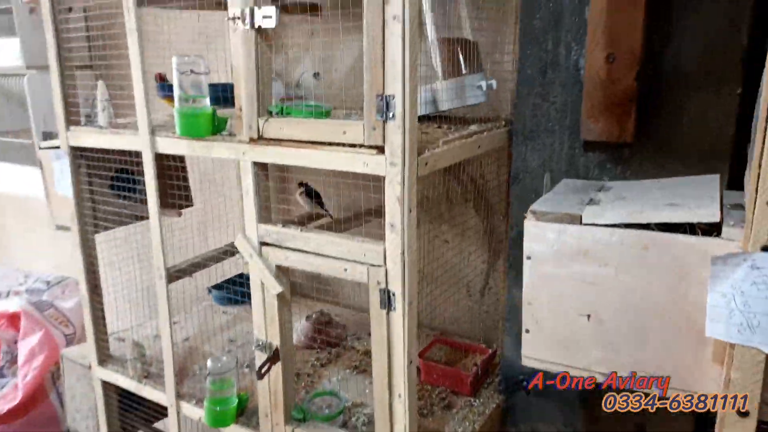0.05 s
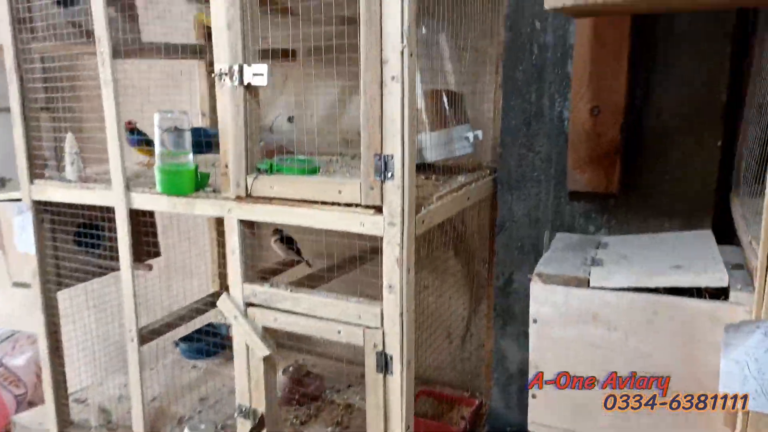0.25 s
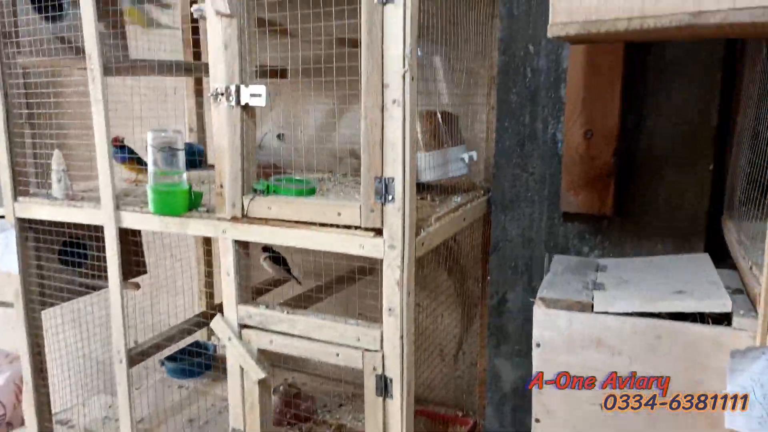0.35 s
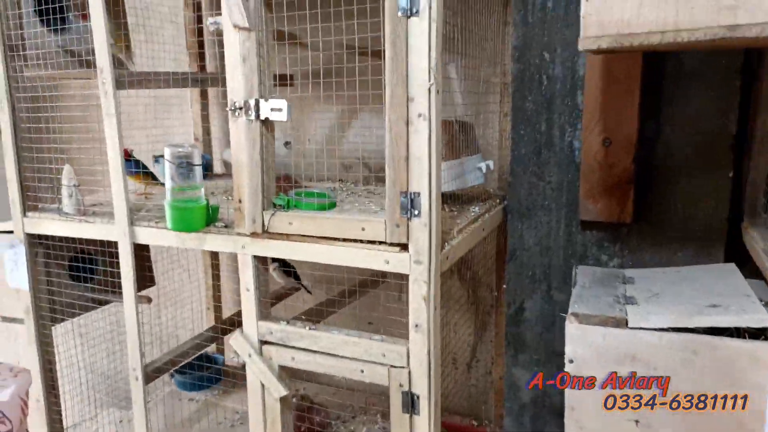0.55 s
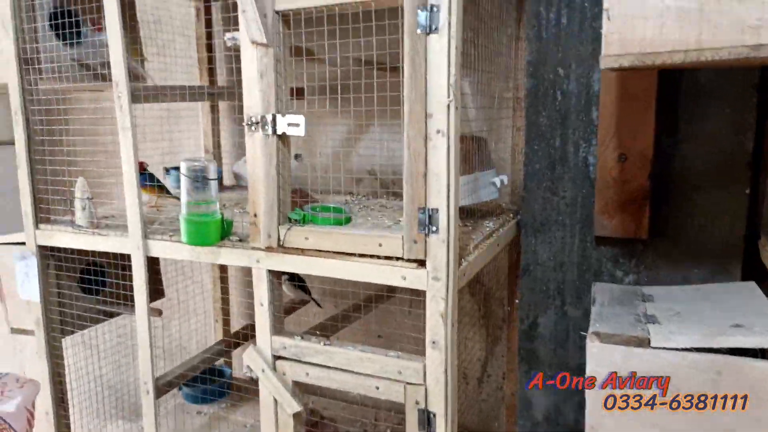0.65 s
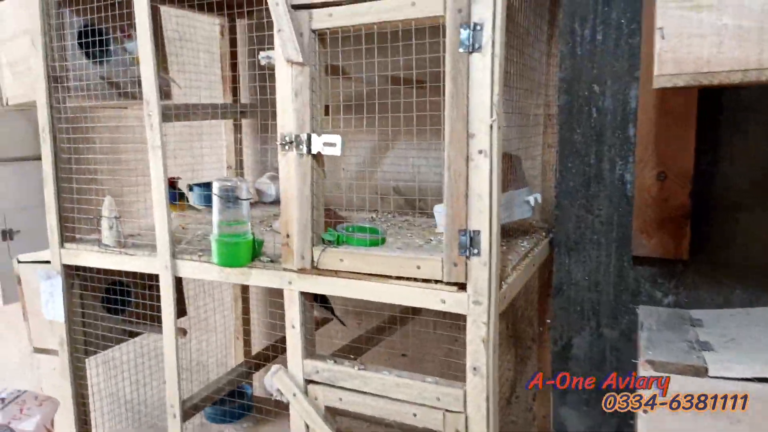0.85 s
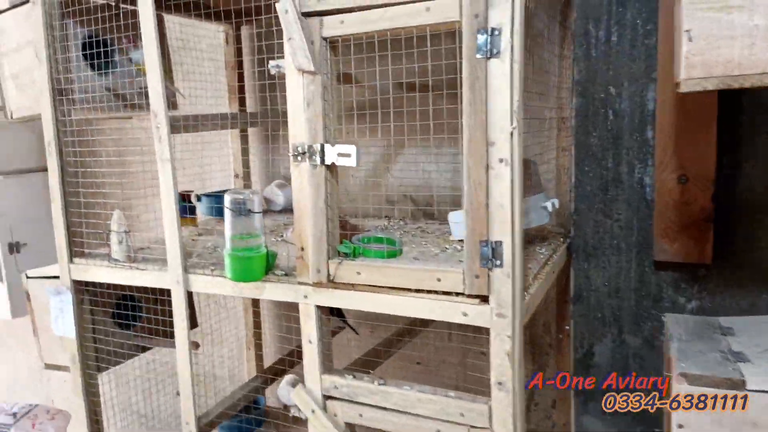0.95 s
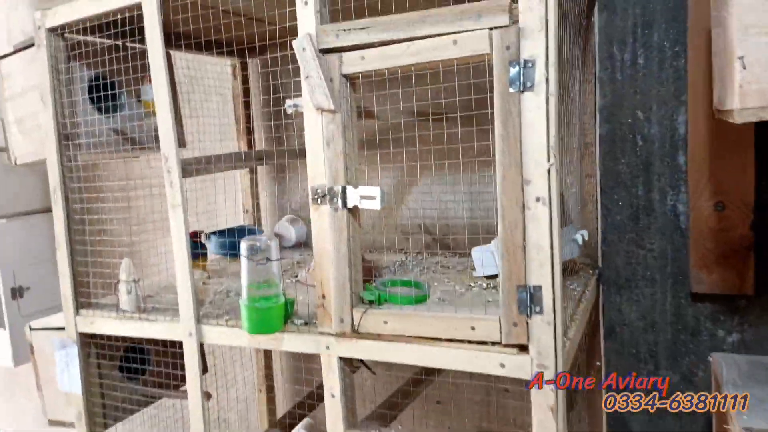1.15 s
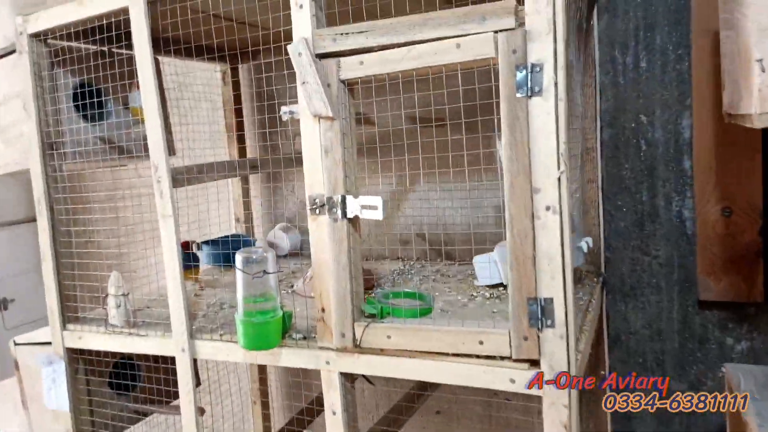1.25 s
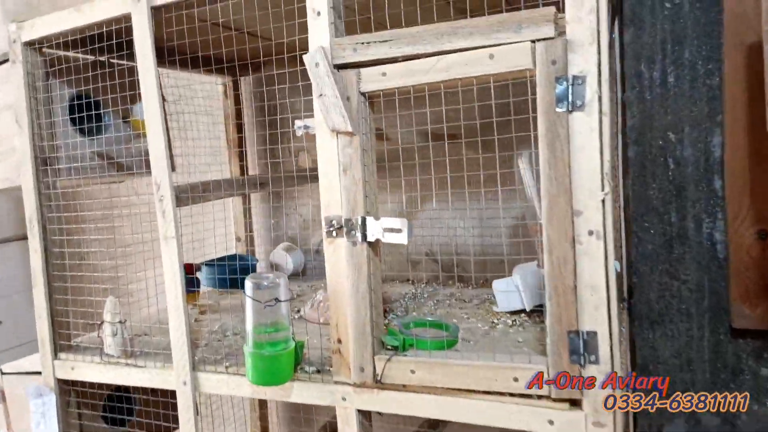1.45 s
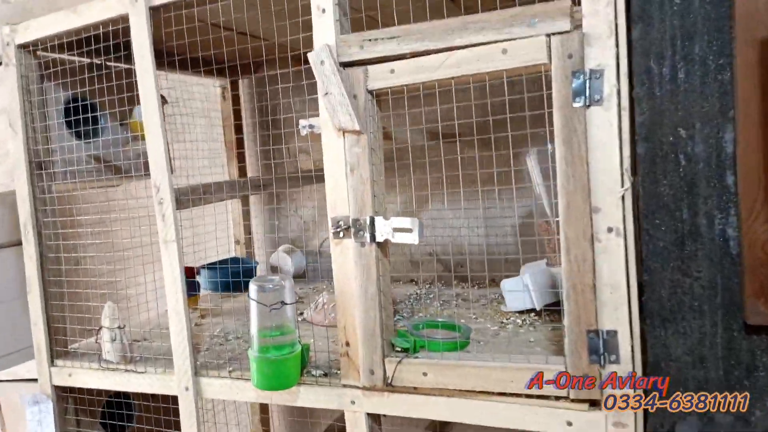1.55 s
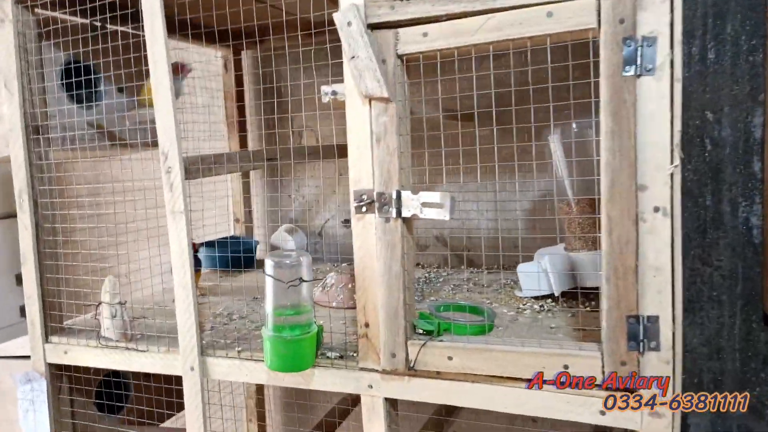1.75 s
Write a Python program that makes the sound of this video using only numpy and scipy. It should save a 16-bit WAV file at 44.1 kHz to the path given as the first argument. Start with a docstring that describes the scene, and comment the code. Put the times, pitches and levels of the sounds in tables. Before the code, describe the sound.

Caged finches chirp hoarsely in a rapid run, with sharp whistles and a faint flock behind

```python
"""A small room with wooden cages: finches call close by in a run of hoarse chirps, about nine a second.
Each chirp is a chopped, gliding tone near 6 kHz over irregular pulses ringing in beak and throat,
with an overload crackle on top. Other birds add short gliding whistles and nasal harmonic notes;
one bumps a perch, a decaying sine. Decaying noise gives the echoes of cages and room;
shaped noise gives a far flock and a low rumble."""
import sys
import numpy as np
from scipy import signal
from scipy.fft import rfft, irfft, next_fast_len
from scipy.io import wavfile
from scipy.ndimage import uniform_filter1d, map_coordinates

SR = 44100
rng = np.random.default_rng(int(sys.argv[2]) if len(sys.argv) > 2 else 0)


def store_pcm(level_fs):
    """Save levels as 16-bit WAV."""
    pcm = np.round(np.clip(level_fs, -1, 1) * 32767).astype(np.int16)
    wavfile.write(sys.argv[1], SR, np.atleast_2d(pcm).T)


N = 79380

# hoarse chirps: (start [s], squeak length [s], rasp delay [s], rasp length [s], squeak pitch [Hz],
# squeak level [dB], beak level [dB], throat level [dB], low throat level [dB], crackle level [dB])
CHIRPS = [(0.194, 0.13, 0.0041, 0.1, 6070, -24, -19, -28, -30.5, -35),
          (0.315, 0.1, 0.0058, 0.096, 6080, -17.5, -18.5, -25.5, -39.5, -30),
          (0.457, 0.12, 0, 0.12, 6106, -19.5, -22.5, -22, -34.5, -36.5),
          (0.597, 0.0886, 0, 0.1, 5960, -20, -23, -22.5, -29.5, -50),
          (0.699, 0.049, 0.0014, 0.067, 5950, -24.5, -24, -28, -38, -40.5),
          (0.737, .120, 0.00033, .110, 6020, -25.5, -26.5, -20.5, -34, -45.5),
          (0.868, 0.14, 0.0075, 0.1, 6080, -24.5, -25, -23.5, -23.5, -36),
          (1.014, 0.119, 0.00021, 0.11, 5900, -34.5, -27, -22, -33.5, -47.5),
          (1.104, .050, 0.0059, 0.067, 6100, -36, -27.5, -40, -29.5, -43),
          (1.151, 0.15, 0.0067, 0.13, 5950, -27, -24.5, -23, -32, -45.5),
          (1.250, 0.1285, .000, 0.11, 6000, -29, -25, -24, -28.5, -49),
          (1.418, 0.1, 0, 0.094, 5994, -27.5, -33, -32.5, -32.5, -48.5)]
# resonances of the rasp: (centre [Hz], width of each of two cascaded sections [Hz], relative level [dB])
BEAK = [(5130, 930, 2), (5805, 500, 2.5), (6563, 580, -5.5), (8100, 1100, -33)]
THROAT = [(3765, 820, 2.5), (4200, 860, -1), (8270, 280, -29)]
LOW_THROAT = [(2360, 1070, -3), (3094, 800, 2)]
# spectrum of the overload crackle: (frequency [Hz], relative level [dB])
CRACKLE = [(800, -9), (2000, 1.5), (7000, -12), (9500, -1), (11500, -1), (13000, 2.5), (15500, 3.5)]
# whistles: (start [s], length [s], start pitch [Hz], end pitch [Hz], level [dB], roughness [ratio])
WHISTLES = [(.000, .020, 2390, 2120, -35.5, 1.1), (.000, 0.01, 4325, 4380, -32.5, 0.9),
            (0.021, 0.047, 2766, 2830, -32, 0.68), (0.401, 0.024, 1380, 1490, -42.5, .6),
            (0.688, 0.033, 3167, 3210, -29.5, .9), (.718, 0.022, 1660, 1826, -44.5, 0.8),
            (0.803, 0.027, 1322, 1308, -41.5, 0.2), (0.956, 0.048, 2690, 3390, -29, 0.89),
            (.995, 0.033, 2550, 2560, -34, 0.54), (1.128, 0.028, 3225, 3284, -28.5, 0.4),
            (1.197, 0.022, 4115, 4030, -17.5, 0.5), (1.226, 0.018, 4090, 4097, -7.5, .1),
            (1.248, 0.026, 4033, 4146, -13.5, .1), (1.251, 0.0206, 3200, 3250, -19, .2),
            (1.264, 0.0353, 3970, 3872, -16, .4), (1.313, 0.022, 3930, 3943, -17.5, 0.22),
            (1.416, 0.089, 2300, 2330, -38.5, 0.8), (1.432, 0.0368, 3770, 3420, -29.5, 0.68),
            (1.454, 0.023, 3246, 3104, -24, .6), (1.484, 0.043, 3168, 2824, -24, 0.6),
            (1.523, 0.086, 3180, 3140, -35, 0.12), (1.759, .060, 2520, 2446, -37, 0.68),
            (1.786, 0.048, 3150, 3150, -28, .2)]
# nasal notes: (start [s], length [s], start pitch [Hz], end pitch [Hz], level [dB], roughness [ratio])
NASALS = [(-.02, 0.079, 549, 543, -34, 0.99), (0.086, 0.073, 771, 777, -44, 1.15),
          (1.508, 0.1296, 531.2, 507.5, -33, 0.14), (1.737, 0.1, 600, 636, -37, 0.78)]
# strength of the nasal harmonics: (frequency [Hz], relative level [dB])
NASAL_COLOUR = [(500, -39), (1500, -15), (2100, -12), (2650, -1), (3150, -1.5), (3700, -3.5), (4200, 2.5),
                (4750, -4), (6000, -14.5), (7500, -47), (10000, -34)]
# decay of the room: (frequency [Hz], time to fall 60 dB [s])
ROOM_T60 = [(300, 0.97), (3000, 0.4), (6000, 0.29), (14000, 0.18)]
# tone of the left microphone, which faces away from the cages: (frequency [Hz], gain [dB])
LEFT_SHADE = [(300, -39), (900, -3.5), (2000, -8), (3000, -9), (3900, -8.5), (4700, -16), (6000, -19.5),
              (6600, -23), (7200, 7), (8100, 9), (9500, -2), (12000, -0.5), (14000, -2.5), (15200, -24)]
# spectrum of the distant birds: (frequency [Hz], relative level [dB per Hz])
FAR_FLOCK = [(500, -26.5), (1100, 0.5), (2000, 8), (3000, 5), (4300, -0.5), (6000, 4.5), (8000, -19.5),
             (11000, -19), (15500, -14)]
# mean level of the distant birds: (time [s], level [dB])
FAR_FLOCK_LEVEL = [(0, -42), (.18, -42.5), (.3, -38.5), (1.35, -38.5), (1.66, -37), (1.8, -42.5)]
# spectrum of the room rumble: (frequency [Hz], relative level [dB per Hz])
RUMBLE = [(15, -67), (25, -26), (80, -11), (107, -0.5), (146, 2), (238, -7.5), (328, -8), (492, -15.5),
          (560, -10.5), (648, -16.5), (692, -14), (911, -15.5), (1200, -16.5), (1560, -29), (2640, -120)]
# likeness of the rumble at the two microphones: (frequency [Hz], left-right correlation [ratio])
RUMBLE_ALIKE = [(30, 0.69), (100, 0.96), (250, 0.92), (600, 0.58), (1200, 0.07)]

SQUEAK_ATTACK_S, SQUEAK_RELEASE_S = 0.023, 0.092
SQUEAK_RISE_HZ, SQUEAK_ARCH_HZ, SQUEAK_JITTER_HZ = 201.6, 118, 198.4
FLUTTER_PER_S, FLUTTER_DB = 160, 2
BUZZ_PER_S, BUZZ_SCATTER, BUZZ_DEPTH = 260, 0.2456, 1  # mean rate, relative scatter, depth 0-1
PULSES_PER_S, PULSE_SCATTER_DB = 1100, 4
RASP_ATTACK_S, RASP_RELEASE_S = 0.049, 0.068
RASP_FLUTTER_PER_S, RASP_FLUTTER_DB, RASP_LOW_CUT_HZ = 160, 0.5, 1500
WHISTLE_EDGE_S, WHISTLE_JITTER_HZ, WHISTLE_FLUTTER_DB, OVERTONE_DB = 0.0056, 162, 2, -59
NASAL_EDGE_S, NASAL_ARCH_HZ, NASAL_JITTER = 0.02, 5.74, 0.048  # jitter as a share of the pitch
PERCH_S, PERCH_HZ, PERCH_DB, PERCH_ATTACK_S, PERCH_T60_S = 0.4, 319.3, -27, 0.023, 0.14
ROOM_DB, CAGE_DB, CAGE_T60_S = -3.5, -3, 0.032
WHISTLE_ECHO_DB, NASAL_ECHO_DB = -2, -0.5  # sent to the echoes, against the chirps
LEFT_DIRECT_DB, LEFT_ECHO_DB, RIGHT_ECHO_DB = -11.5, 2.5, -1
RUMBLE_DB = -43.5
TOP_HZ = 15950


def amp(db):
    """Level in decibels to amplitude ratio."""
    return 10 ** (np.asarray(db) / 20)


def unit(x):
    """Normalisation to an rms of 1."""
    return x / np.sqrt(np.mean(x ** 2) + 1e-20)


def along(points, hz):
    """Interpolation of (frequency [Hz], value) points on a logarithmic frequency axis."""
    f, value = np.transpose(points)
    return np.interp(np.log(hz + 1), np.log(f + 1), value)


def wobble(rate):
    """Band-limited random modulation: a smooth curve through `rate` random knots a second."""
    knots = rng.standard_normal(N // 8)
    return map_coordinates(knots, [np.arange(N) * rate / SR], mode="wrap")


def filtered(x, response):
    """Linear filtering: the spectrum times a complex response of frequency."""
    m = next_fast_len(N + SR // 4)
    hz = np.fft.rfftfreq(m, 1 / SR)
    return irfft(rfft(x, m) * response(hz), m)[..., :N]


def coloured(x, points):
    """Spectral shaping by (frequency [Hz], level [dB]) points."""
    return filtered(x, lambda hz: amp(along(points, hz)))


def envelope(start, length, attack, release):
    """Amplitude envelope: quarter-sine attack and release, multiplied where they overlap."""
    t = np.arange(N) / SR - start
    rise = np.sin(np.pi / 2 * np.clip(t / attack, 0, 1))
    fall = np.sin(np.pi / 2 * np.clip((length - t) / release, 0, 1))
    return rise * fall


def progress(start, length):
    """Normalised time: 0 before a call, 1 after it."""
    return np.clip((np.arange(N) / SR - start) / length, 0, 1)


def phase_of(hz):
    """Phase as the running integral of instantaneous frequency."""
    return 2 * np.pi * np.cumsum(hz) / SR


def squeaks():
    """Frequency and amplitude modulation: a rising, arching tone chopped by an uneven buzz."""
    out = np.zeros(N)
    jitter = SQUEAK_JITTER_HZ * wobble(900)
    buzz_rate = BUZZ_PER_S * (1 + BUZZ_SCATTER * wobble(120))
    buzz = 1 + BUZZ_DEPTH * np.sin(phase_of(buzz_rate))
    flutter = unit(buzz * amp(FLUTTER_DB * np.tanh(wobble(FLUTTER_PER_S))))
    for start, length, _, _, hz, db, *_ in CHIRPS:
        u = progress(start, length)
        glide = SQUEAK_RISE_HZ * (u - .5) + SQUEAK_ARCH_HZ * (np.sin(np.pi * u) - .5)
        tone = np.sin(phase_of(hz + glide + jitter))
        out += amp(db) * envelope(start, length, SQUEAK_ATTACK_S, SQUEAK_RELEASE_S) * tone
    return np.sqrt(2) * flutter * out


def pulses():
    """Impulsive excitation: pulses irregular in time and uneven in size, for syrinx and crackle."""
    timing, size = rng.standard_normal((2, N // 8))
    at = np.round((np.arange(N // 8) + .4 * timing) * SR / PULSES_PER_S).astype(int)
    inside = (at >= 0) & (at < N)
    return np.bincount(at[inside], amp(PULSE_SCATTER_DB * np.tanh(size[inside])), N)


def ringing(resonances):
    """Source-filter principle: pulses ring in parallel resonances, each two band-pass sections deep."""
    total = np.zeros(N)
    for centre, width, db in resonances:
        def resonance(f):
            return (1j * f * width / (centre ** 2 - f ** 2 + 1j * f * width)) ** 2
        total += amp(db) * unit(filtered(pulses(), resonance))
    return unit(total)


def rasps():
    """Source-filter mixing: beak and throat shares change by call, with a crackle of overload on top."""
    crackle = unit(coloured(pulses(), CRACKLE))
    layers = np.array([ringing(BEAK), ringing(THROAT), ringing(LOW_THROAT), crackle])
    # third-order high-pass without phase shift
    layers = filtered(layers, lambda hz: hz ** 3 / np.sqrt(hz ** 6 + RASP_LOW_CUT_HZ ** 6))
    flutter = unit(amp(RASP_FLUTTER_DB * wobble(RASP_FLUTTER_PER_S)))
    out = np.zeros(N)
    for start, _, delay, length, _, _, *levels in CHIRPS:
        shape = envelope(start + delay, length, RASP_ATTACK_S, RASP_RELEASE_S)
        out += shape * (amp(levels) @ layers)
    return flutter * out


def whistles():
    """Frequency modulation: short gliding, jittering tones with a weak second harmonic."""
    out = np.zeros(N)
    for start, length, start_hz, end_hz, db, rough in WHISTLES:
        glide = start_hz + (end_hz - start_hz) * progress(start, length)
        phase = phase_of(glide + rough * WHISTLE_JITTER_HZ * wobble(700))
        tone = np.sin(phase) + amp(OVERTONE_DB) * np.sin(2 * phase)
        out += amp(db) * envelope(start, length, WHISTLE_EDGE_S, WHISTLE_EDGE_S) * tone
    return np.sqrt(2) * out * unit(amp(WHISTLE_FLUTTER_DB * wobble(300)))


def nasals(count=16):
    """Additive synthesis: strong upper harmonics of a low pitch, hoarse where the pitch jitters."""
    out = np.zeros(N)
    k = np.arange(1, count + 1)
    for start, length, start_hz, end_hz, db, rough in NASALS:
        u = progress(start, length)
        glide = start_hz + (end_hz - start_hz) * u + NASAL_ARCH_HZ * np.sin(np.pi * u)
        pitch = glide * (1 + rough * NASAL_JITTER * wobble(600))
        offsets = rng.uniform(0, 2 * np.pi, (count, 1))
        harmonics = np.sin(k[:, None] * phase_of(pitch) + offsets)
        stack = amp(along(NASAL_COLOUR, k * start_hz)) @ harmonics
        out += amp(db) * envelope(start, length, NASAL_EDGE_S, NASAL_EDGE_S) * unit(stack)
    return out


def perch():
    """Damped oscillation: a soft wooden bump, as of a bird landing, is one decaying sine."""
    t = np.maximum(np.arange(N) / SR - PERCH_S, 0)
    decay = amp(PERCH_DB - 60 * t / PERCH_T60_S)
    return decay * np.minimum(t / PERCH_ATTACK_S, 1) * np.sin(2 * np.pi * PERCH_HZ * t)


def echoes(x):
    """Convolution reverberation: short cage-board and longer room decays, different at each microphone."""
    hz, t, z = signal.stft(rng.standard_normal((2, SR // 2)), SR, nperseg=256)
    room_decay = amp(-60 * t / along(ROOM_T60, hz)[:, None])
    tail = signal.istft(z * room_decay, SR, nperseg=256)[1]
    board_decay = np.exp(-np.log(1000) * np.arange(tail.shape[1]) / SR / CAGE_T60_S)
    boards = rng.standard_normal(tail.shape) * board_decay
    answer = amp(ROOM_DB) * tail / np.linalg.norm(tail[0])
    answer += amp(CAGE_DB) * boards / np.linalg.norm(boards[0])
    delayed = np.pad(x, (SR // 500, 0))  # first reflection after 2 ms
    return signal.fftconvolve(delayed[None], answer, axes=1)[:, :N]


def far_flock(swell_db=2.0, patchy_db=3.5):
    """Time-frequency modulation of noise: a faint, patchy wash of birds farther off."""
    z = signal.stft(rng.standard_normal((2, N)), nperseg=512)[2]
    field = uniform_filter1d(rng.standard_normal(z.shape[1:]), size=3, axis=0)  # over frequency
    field = uniform_filter1d(field, size=8, axis=1)  # over time
    patches = signal.istft(z * amp(patchy_db * unit(field)), nperseg=512)[1][:, :N]
    level_db = np.interp(np.arange(N) / SR, *np.transpose(FAR_FLOCK_LEVEL))
    return amp(level_db + swell_db * wobble(8.9)) * unit(coloured(patches, FAR_FLOCK))


def rumble():
    """Partly coherent noise: steady rumble, most alike at the two microphones near 100 Hz."""
    def mid_and_side(hz):
        angle = np.arccos(np.clip(along(RUMBLE_ALIKE, hz), -1, 1)) / 2
        return amp(along(RUMBLE, hz)) * [np.cos(angle), np.sin(angle)]
    mid, side = filtered(rng.standard_normal((2, N)), mid_and_side)
    return amp(RUMBLE_DB) * unit(np.array([mid + side, mid - side]))


def scene():
    """Direct and reflected sound: birds to the right, so the left microphone hears mostly reflections."""
    birds = np.array([squeaks() + rasps(), whistles(), nasals()])
    direct = amp([[LEFT_DIRECT_DB], [0]]) * birds.sum(axis=0)
    echo_send = amp([0, WHISTLE_ECHO_DB, NASAL_ECHO_DB]) @ birds
    reflected = amp([[LEFT_ECHO_DB], [RIGHT_ECHO_DB]]) * echoes(echo_send)
    left, right = direct + reflected + far_flock()
    return np.array([coloured(left, LEFT_SHADE), right]) + rumble() + perch()


def record(dry):
    """Band limiting: the camera keeps nothing above its upper frequency limit."""
    return filtered(dry, lambda hz: hz < TOP_HZ)


dry = scene()
out = record(dry)
store_pcm(out)
```